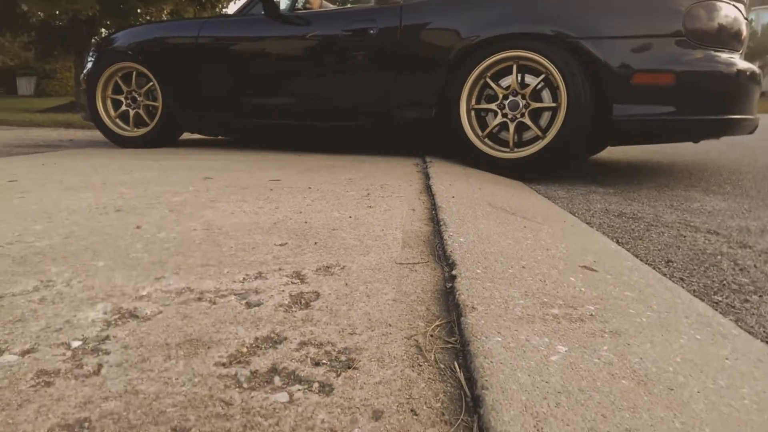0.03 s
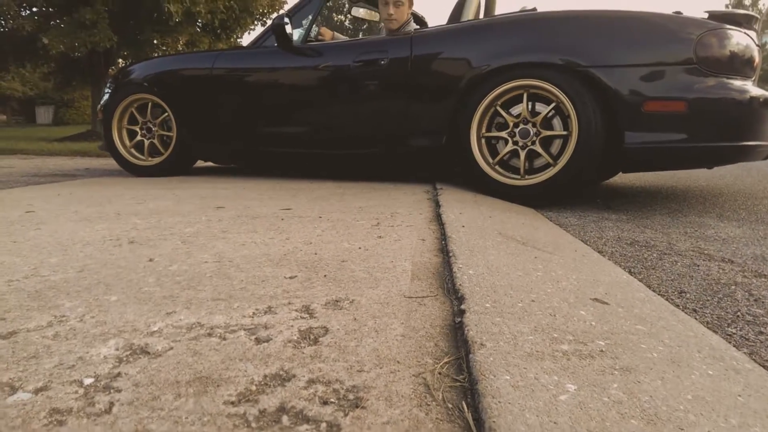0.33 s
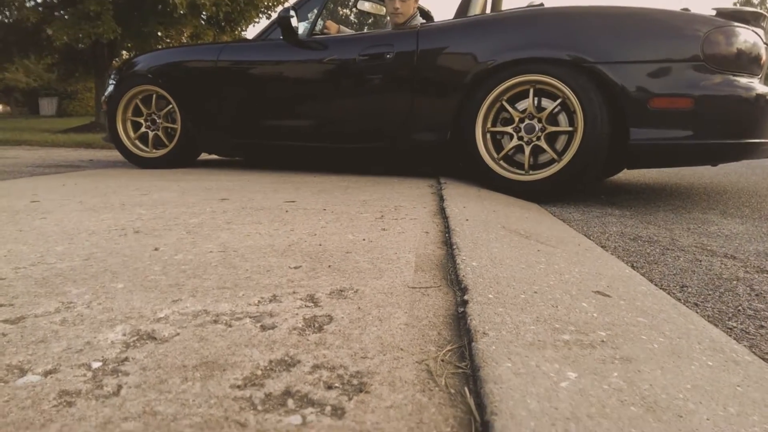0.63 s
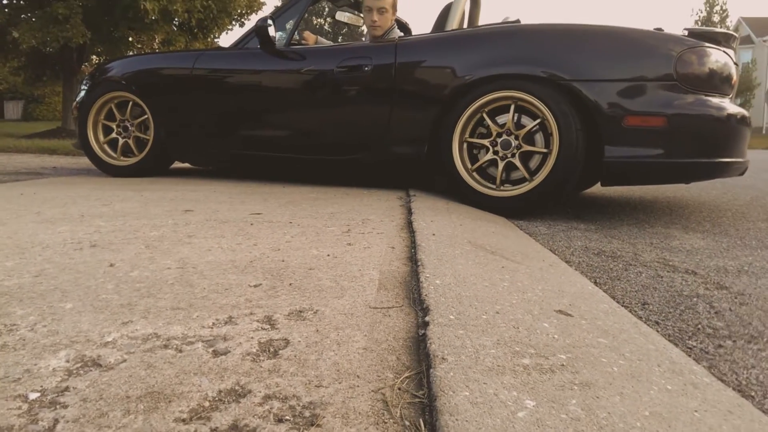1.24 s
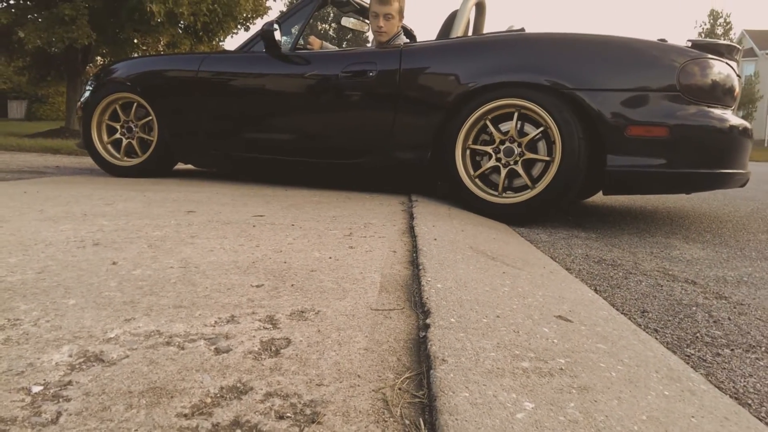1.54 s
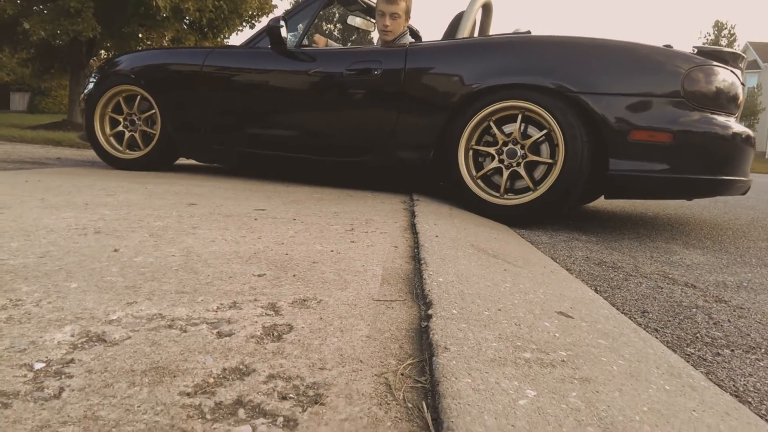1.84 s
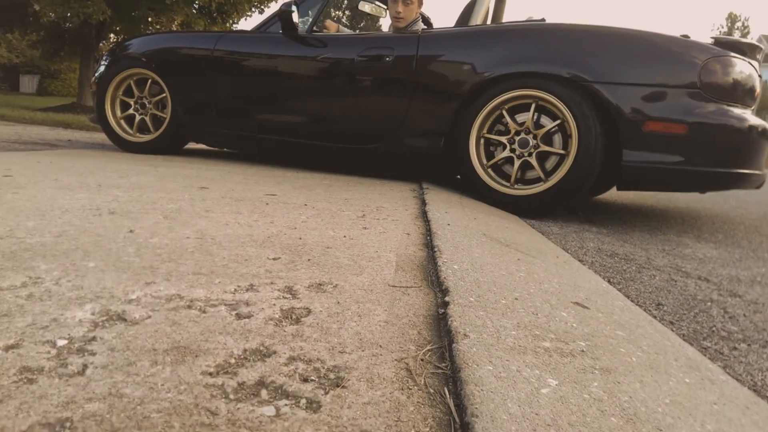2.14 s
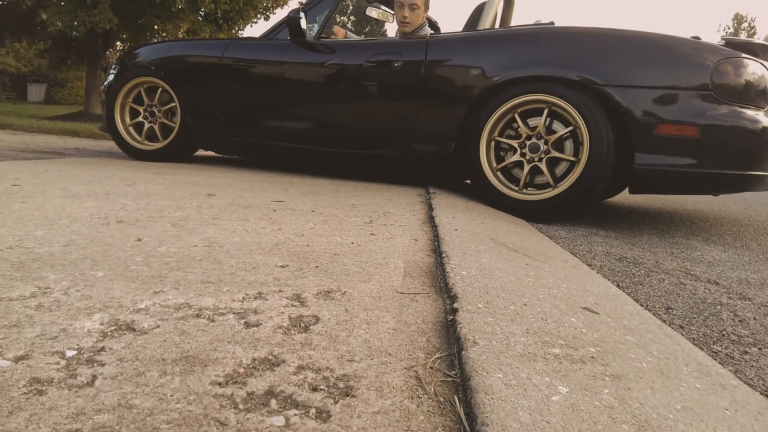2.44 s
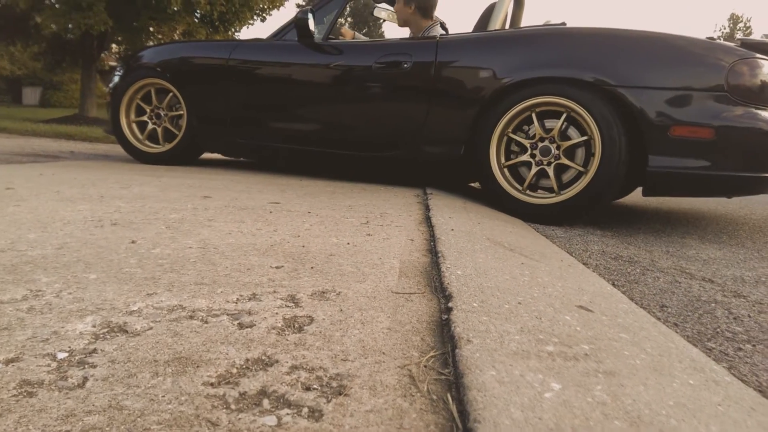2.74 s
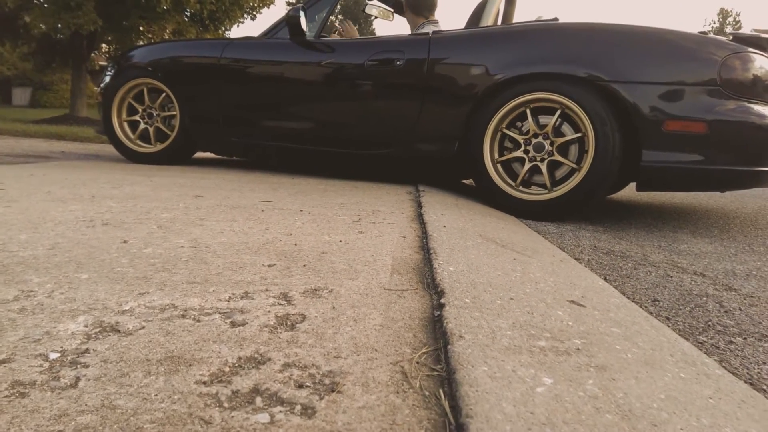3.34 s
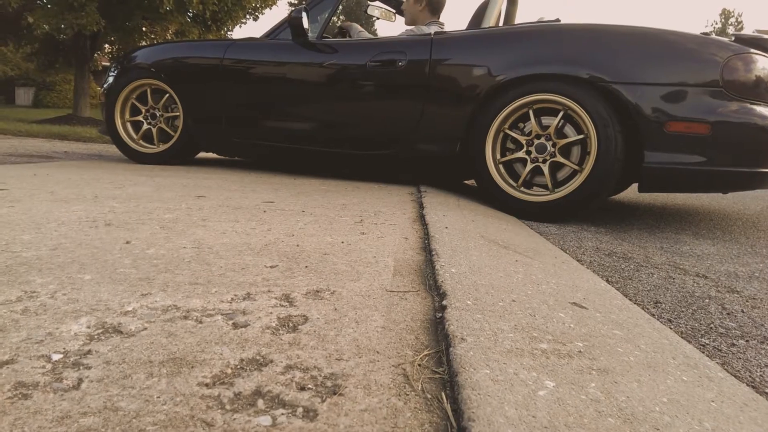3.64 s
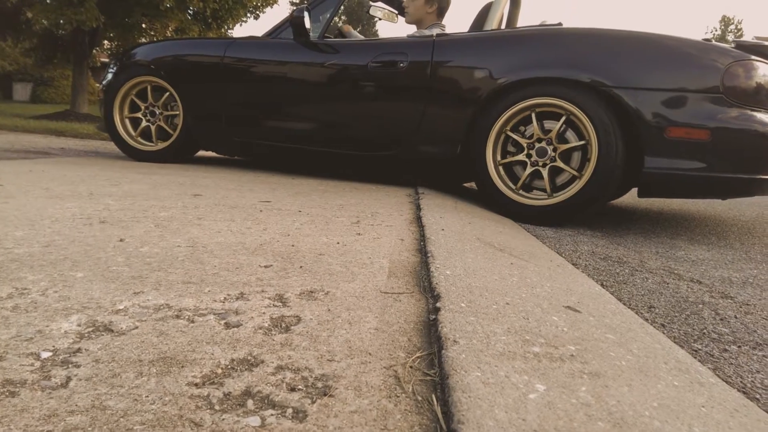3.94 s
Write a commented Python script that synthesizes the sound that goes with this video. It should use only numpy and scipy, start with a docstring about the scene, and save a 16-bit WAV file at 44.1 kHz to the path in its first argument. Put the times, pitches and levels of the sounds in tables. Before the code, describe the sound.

A sports car's deep exhaust burbles a few metres away, mostly on the right. Its underside grinds on a concrete driveway, then the engine revs, nearly stalls through a second scrape, and rattles as it revs again.

```python
"""A deep, burbling exhaust is heard a few metres away, mostly on the right: a low sports car is
creeping over the crest of a concrete driveway. Its four cylinders fire in turn and make the pipe ring.
The engine whirrs, is revved briefly twice and nearly stalls in between, rattling as it picks up again.
The underside grinds on the concrete in two bouts, ringing the floor panel, and touches faintly once more.
There are also faint, thin, high two-note chirps, probably a distant small bird, and one lower squeal."""
import sys
import numpy as np
from scipy import signal
from scipy.fft import rfft, irfft
from scipy.io import wavfile
from scipy.ndimage import uniform_filter1d

SR = 44100
rng = np.random.default_rng(int(sys.argv[2]) if len(sys.argv) > 2 else 0)


def unload_wav(signal):
    """Save mono or channel-first audio to the path in sys.argv[1] as 16-bit WAV at rate SR, clipped to [-1, 1]."""
    wavfile.write(
        sys.argv[1],
        SR,
        np.round(np.clip(np.atleast_2d(signal).T, -1, 1) * 32767).astype(np.int16),
    )


N = 176400
T = np.arange(N) / SR


def from_db(db):
    """Turn decibels into a number to multiply by."""
    return 10 ** (np.asarray(db) / 20)


def unit_power(x):
    """Scale a sound so that its average power is 1."""
    return x / np.sqrt(np.mean(x ** 2) + 1e-20)


def evened(x, size=6000):
    """Even out slow swells, holding the power near 1."""
    return x / np.sqrt(uniform_filter1d(uniform_filter1d(x * x, size), size) + 1e-18)


def curves(rows):
    """Join a table's timed points with straight lines: one curve for each column after the time."""
    times, *columns = np.transpose(rows)
    return [np.interp(T, times, column) for column in columns]


def keep_band(x, hz, kind, order=2):
    """Keep the "low" or the "high" side of a frequency."""
    sections = signal.butter(order, np.minimum(hz, .45 * SR), kind, fs=SR, output="sos")
    return signal.sosfilt(sections, x + 1e-18)


def coloured(x, colour):
    """Shape a sound's bass and treble from a table; the result has power 1."""
    hz, db = np.transpose(colour)
    bins_hz = np.arange(N // 2 + 1) * SR / N + 1e-3
    gain = from_db(np.interp(np.log(bins_hz), np.log(hz), db))
    gain /= np.sqrt(1 + (hz[0] / bins_hz / 2) ** 4)  # fade out below the table
    return unit_power(irfft(rfft(x) * gain, N))


def noise():
    """Plain white hiss."""
    return rng.standard_normal(N)


def drift(hz):
    """A random wobble, mostly slower than hz."""
    return unit_power(keep_band(rng.standard_normal(N + SR), hz, "low")[SR:])


def resonate(x, modes):
    """Make a sound ring at several pitches; the narrower the width, the longer the ring."""
    out = 0
    for hz, width_hz, db in modes:
        decay = np.exp(-np.pi * width_hz / SR)
        feed = np.array([1, 0, -1]) * (1 - decay * decay) / 2
        feedback = [1, -2 * decay * np.cos(2 * np.pi * hz / SR), decay * decay]
        out = out + from_db(db) * signal.lfilter(feed, feedback, x + 1e-18)
    return out


def smear(x, fade_s, samples):
    """Spread a sound into a noisy tail that falls 60 dB in fade_s."""
    tail = rng.standard_normal(samples) * from_db(-60 * T[:samples] / fade_s)
    return signal.fftconvolve(x, tail / np.linalg.norm(tail))[:N]


def steel(x):
    """Sheet steel adds a thicket of brief, closely spaced rings."""
    return x + from_db(-2) * smear(x, fade_s=.07, samples=SR // 8)


def reflections(x):
    """Sound scatters briefly off the ground and the car's body."""
    return from_db(-14) * keep_band(smear(x, fade_s=.088, samples=SR // 4), 860, "high")


def wavering_tone(hz, width_hz):
    """A tone whose pitch wanders around hz."""
    angle = 2 * np.pi * np.cumsum(hz + width_hz * drift(width_hz)) / SR
    return np.sqrt(2) * np.sin(angle)


def thin_tones():
    """A fading whine, faint high two-note chirps (probably a distant small bird) and one lower squeal."""
    # four high chirp notes, then the squeal: start_s, length_s, pitch_hz, level_db
    notes = [(1.272, 0.029, 8140, -56), (1.316, 0.077, 7300, -55), (2.531, 0.065, 7860, -65),
             (2.592, .05, 7350, -52), (2.868, .125, 3360, -43)]
    out = from_db(-55 - 20 * T) * wavering_tone(3260 - 310 * T, width_hz=49)  # the whine
    for start_s, length_s, hz, db in notes:
        swell = np.sin(np.pi * np.clip((T - start_s) / length_s, 0, 1))
        sinking_hz = hz - 480 * (T - start_s - length_s / 2)
        out += from_db(db) * swell * wavering_tone(sinking_hz, width_hz=205 * (hz / 8140) ** 2)
    return out


def engine_bay():
    """A steady, low whirr from inside the steel engine bay."""
    # tone of the whirr: pitch_hz, level_db
    whirr_colour = [(25, -0.5), (160, 24), (480, -0.5), (1200, -17), (2280, -10), (2600, -17), (3300, -16),
                    (4600, -36.5), (15000, -41)]
    return from_db(-29) * coloured(steel(noise()), whirr_colour)


def grains(per_second=2400, spread_db=2.5):
    """Dense clicks of sand and stone breaking under steel."""
    sizes = from_db(spread_db * np.minimum(rng.exponential(1, N), 5)) * rng.choice([-1, 1], N)
    return sizes * (rng.random(N) < per_second / SR)


def scrapes(attack_s=.007, release_s=.013):
    """While the underside touches the concrete, grains grind, ring the floor panel and hiss as grit."""
    # touches of the underside: start_s, length_s, grind_db, panel_db, grit_db
    touches = [(0.889, 0.016, -25.5, -27.5, -45), (0.919, 0.021, -27.5, -23.5, -62),
               (0.954, 0.056, -28, -24.5, -45), (0.993, 0.048, -30.5, -30, -33.5),
               (1.043, 0.092, -36, -37, -40), (1.141, 0.034, -25.5, -41, -41.5),
               (1.187, 0.064, -31.5, -26, -56), (1.247, 0.041, -28.5, -44, -65),
               (1.304, .016, -35, -48, -52), (2.542, 0.046, -41, -58, -67), (2.616, 0.13, -40, -43.5, -60),
               (2.758, 0.025, -29.5, -35.5, -43.5), (2.786, 0.051, -41, -40, -43.5),
               (2.857, 0.024, -49, -38.5, -32), (2.894, 0.058, -35.5, -56, -34),
               (3.832, 0.074, -68, -53, -48.5)]
    # tone of the grinding: pitch_hz, level_db
    grind_colour = [(250, 1.5), (700, 13), (1020, 0), (2250, 1.5), (3200, -1.5), (5500, -37), (15000, -85)]
    # ringing of the floor panel: pitch_hz, width_hz, level_db
    panel_modes = [(629.7, 12.5, 27), (658, 14, 18.5), (762, 10.5, 17), (1281, 17, 15), (1824, 37, -4.5)]
    # tone of the grit: pitch_hz, level_db
    grit_colour = [(1200, 6.5), (3300, 12), (5700, -8), (7800, 4.5), (9600, -7), (12000, 5.5), (16000, -9)]
    levels = np.zeros((3, N))
    for start_s, length_s, *layer_db in touches:
        rise = np.clip((T - start_s) / attack_s, 0, 1)
        fall = np.exp(-np.maximum(T - start_s - length_s, 0) / release_s)
        levels = np.hypot(levels, np.outer(from_db(layer_db), rise * fall))  # powers add up
    judder = from_db(-drift(hz=71))  # the level shakes by about 1 dB
    grind = coloured(steel(judder * grains()), grind_colour)
    panel = unit_power(resonate(judder * grains(), panel_modes))
    grit = coloured(steel(judder * grains()), grit_colour)
    return np.sum(levels * [grind, panel, grit], axis=0)


def firings(first_s=.0207, jitter_s=.00038):
    """The slightly uneven moments at which a cylinder empties into the exhaust."""
    # engine speed: time_s, firings_per_s
    speed = [(0.0, 32.39), (0.2, 33.0), (0.52, 36.3), (0.65, 35.33), (0.84, 37.38), (1.14, 31.81),
             (1.26, 33.33), (1.45, 41.81), (1.6, 45.56), (1.72, 46.19), (1.79, 44.26), (1.88, 45.11),
             (2.02, 43.93), (2.19, 37.41), (2.4, 25.29), (2.57, 15.14), (2.74, 10.3), (2.86, 16.1),
             (3.02, 22.39), (3.2, 25.63), (3.38, 39.42), (3.53, 48.99), (3.68, 50.73), (3.8, 48.06),
             (4.0, 38.74)]
    count = np.cumsum(curves(speed)[0]) / SR
    count -= np.interp(first_s, T, count)
    firing_s = np.interp(np.arange(int(count[-1]) + 1), count, T)
    return firing_s + jitter_s * rng.standard_normal(len(firing_s))


def pulses(times, spread_db):
    """One click of uneven strength at each given time."""
    out = np.zeros(N)
    times = times[times < T[-1]]
    out[(times * SR).astype(int)] = from_db(spread_db * rng.standard_normal(len(times)))
    return out


def puffs(firing_s, lead_s=.0058, rise_s=.0072, spread_db=1.2):
    """A loudness curve that swells around each firing: quick rise, slower fall."""
    ages = np.maximum(T[::20] - firing_s[:, None] + lead_s, 0) / rise_s
    strengths = from_db(spread_db * rng.standard_normal(len(firing_s)))
    swells = strengths @ (ages * np.exp(1 - ages))
    return evened(np.interp(T, T[::20], swells) + .02)  # never quite silent


def rattle(puffing):
    """Each firing shakes a ringing metal part and spits a little hiss, most when the engine labours."""
    # strength of the rattle: time_s, level_db
    rattle_levels = [(0, -53), (.7, -43), (1.5, -48.5), (2.75, -55.5), (2.87, -36), (3.2, -35),
                     (3.3, -39.5), (3.55, -39.5), (4, -51)]
    # tone of the rattle: pitch_hz, level_db
    rattle_colour = [(500, -12), (1300, -11.5), (1900, -5), (3300, -15.5), (4500, -39), (8000, -28)]
    # strength of the hiss: time_s, level_db
    hiss_levels = [(0, -76), (.75, -49), (1.25, -57), (1.45, -73), (2.6, -83.5), (2.87, -57), (3.2, -51.5),
                   (4, -54)]
    # tone of the hiss: pitch_hz, level_db
    hiss_colour = [(2000, 2), (4000, -3.5), (5800, -15.5), (12500, -6.5)]
    ring = unit_power(resonate(noise(), [(2300, 170, 0)]))
    ring = from_db(4.5) * keep_band(ring, 3600, "low", order=4)
    metal = unit_power(coloured(steel(noise()), rattle_colour) + ring)
    hiss = coloured(noise(), hiss_colour)
    return puffing * (from_db(curves(rattle_levels)[0]) * metal + from_db(curves(hiss_levels)[0]) * hiss)


def exhaust(firing_s, puffing, echo_s=.013, build_up_s=.002845, cylinder_lag_s=.0012):
    """Firing pulses, their echo and rushing gas ring the pipe: a deep boom and a smeared bark above."""
    # strength of the exhaust, before the bark is turned down: time_s, boom_db, bark_db
    strength = [(0, -27.5, -33), (.33, -19, -25), (.86, -17, -25), (1.1, -20.5, -26.5),
                (1.52, -16.5, -24.5), (1.65, -23.5, -21.5), (1.74, -22.5, -22.5), (1.785, -26, -30.5),
                (1.85, -18.5, -22.5), (2.12, -17.5, -23.5), (2.68, -34.5, -51), (3.12, -19.5, -28),
                (3.45, -15, -20.5), (4, -16.5, -23)]
    # deep ringing of the pipe: pitch_hz, width_hz, level_db
    boom_modes = [(87.7, 17.4, 12), (136.8, 13.3, 12), (232, 12, -9.5)]
    # higher ringing of the pipe: pitch_hz, width_hz, level_db
    bark_modes = [(318.5, 43.4, -0.5), (363.2, 23, 0), (614.3, 24.3, -5.5), (719.5, 18.2, -3.5)]
    boom = resonate(pulses(firing_s, spread_db=1), boom_modes)
    boom = keep_band(keep_band(boom, 52, "high"), 326, "low")
    gas_rush = from_db(-9) * puffing * noise()
    lag_s = cylinder_lag_s * (np.arange(len(firing_s)) % 2)  # every second cylinder barks later
    bark = 0
    for k, mode in enumerate(bark_modes):
        bark_s = firing_s + k * build_up_s + lag_s  # each higher ring builds up later
        direct = pulses(bark_s, spread_db=3.5)
        echo = from_db(4) * pulses(bark_s + echo_s, spread_db=3.5)
        bark = bark + resonate(evened(direct + echo) + gas_rush, [mode])
    bark = keep_band(keep_band(bark, 185, "high", order=1), 705, "low", order=6)
    boom_db, bark_db = curves(strength)
    return from_db(boom_db) * evened(boom) + from_db(bark_db - 3) * evened(bark)


def scene():
    """All the sounds and their reflections: loud on the right, quieter and duller on the left."""
    firing_s = firings()
    puffing = puffs(firing_s)
    mix = exhaust(firing_s, puffing) + rattle(puffing) + engine_bay() + scrapes() + thin_tones()
    left = keep_band(from_db(-14) * mix + reflections(mix), 6500, "low", order=1)
    right = from_db(5.5) * mix + reflections(mix)
    return np.array([left, right])


def record(dry):
    """Round off the tallest peaks and cut the very highest treble."""
    peak_limit, cutoff_hz = .93, 15500
    rounded = dry / (1 + (dry / peak_limit) ** 8) ** (1 / 8)
    return signal.sosfilt(signal.ellip(10, .1, 80, cutoff_hz, fs=SR, output="sos"), rounded)


dry = scene()
out = record(dry)
unload_wav(out)
```